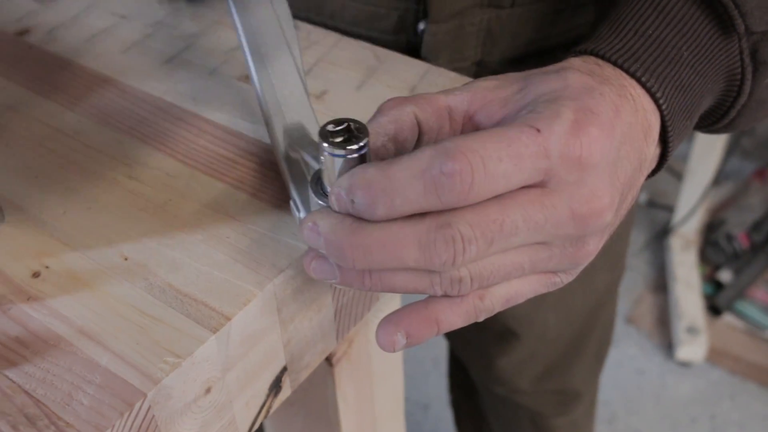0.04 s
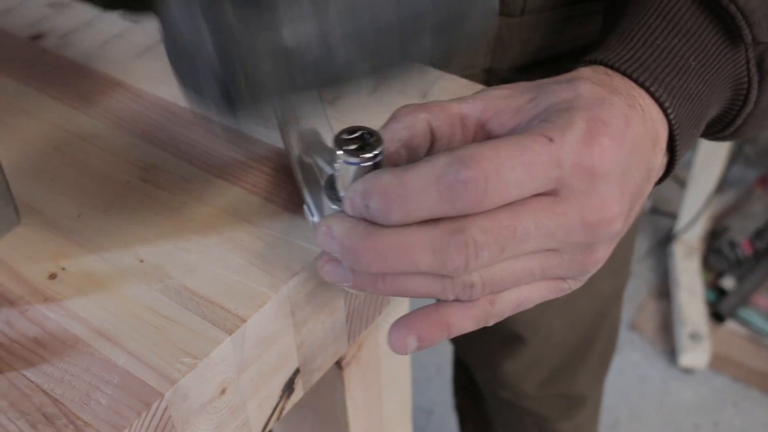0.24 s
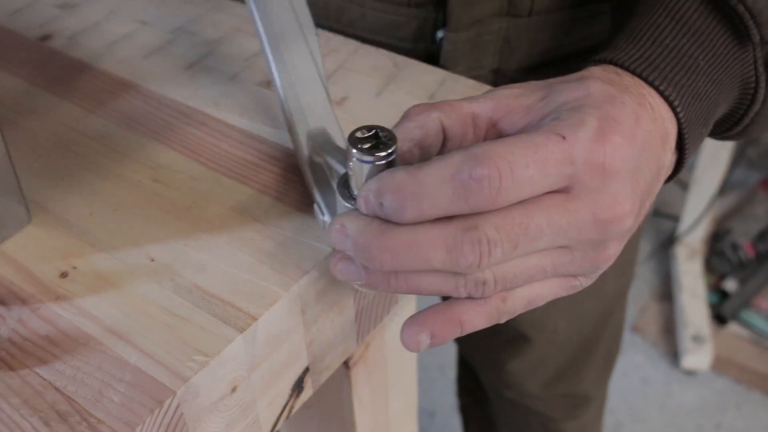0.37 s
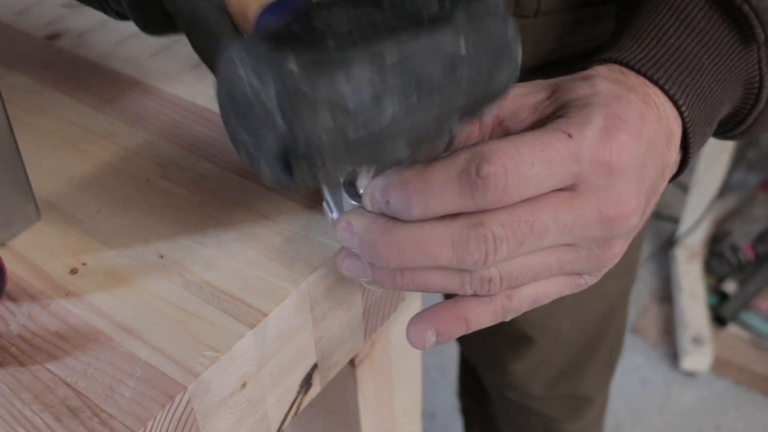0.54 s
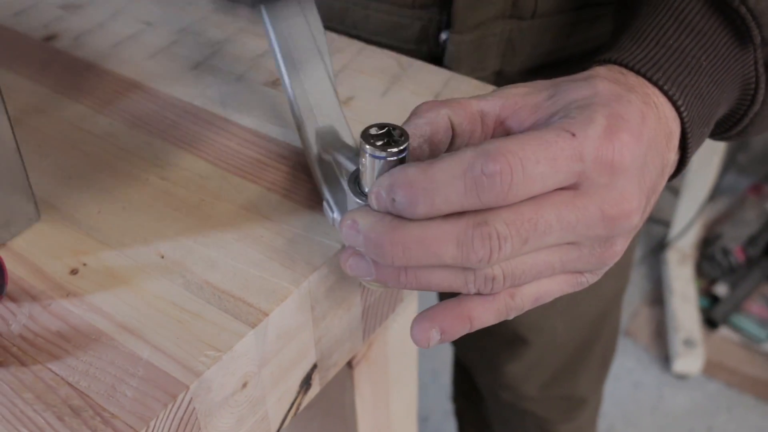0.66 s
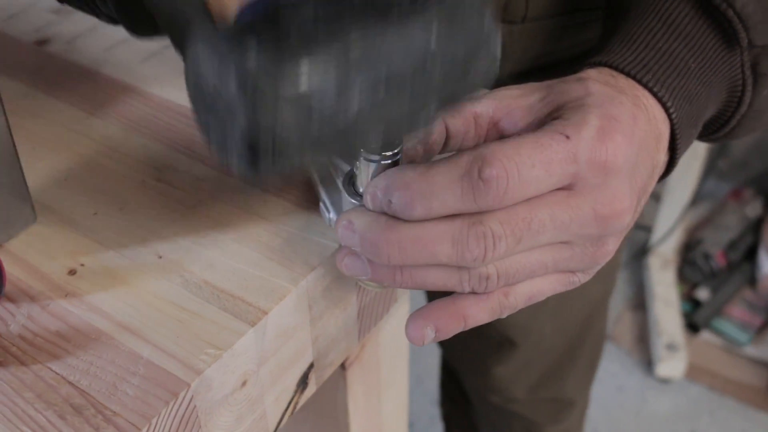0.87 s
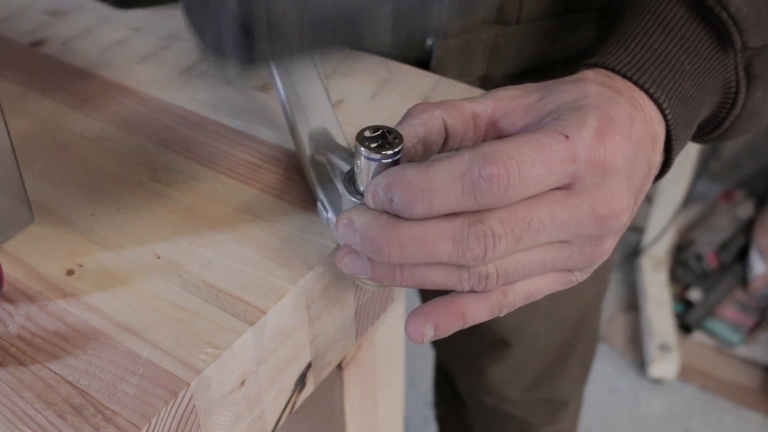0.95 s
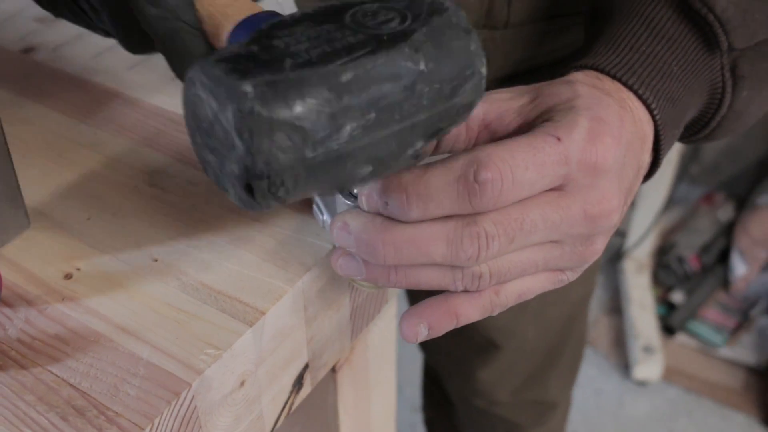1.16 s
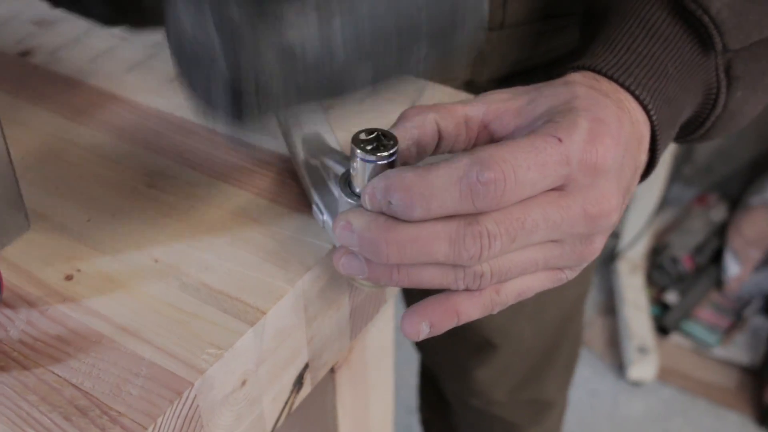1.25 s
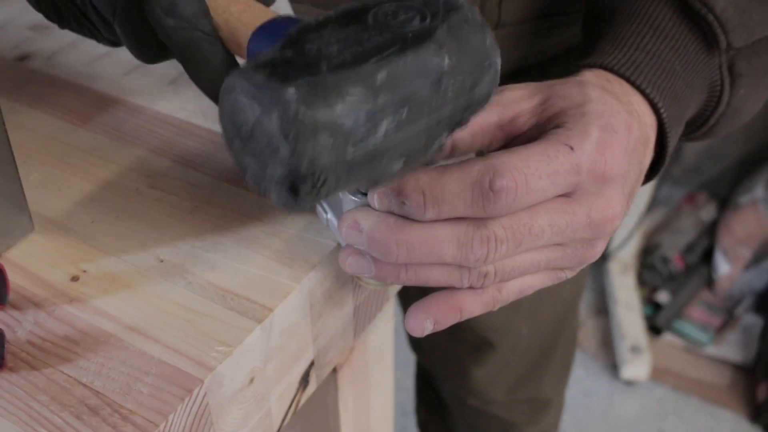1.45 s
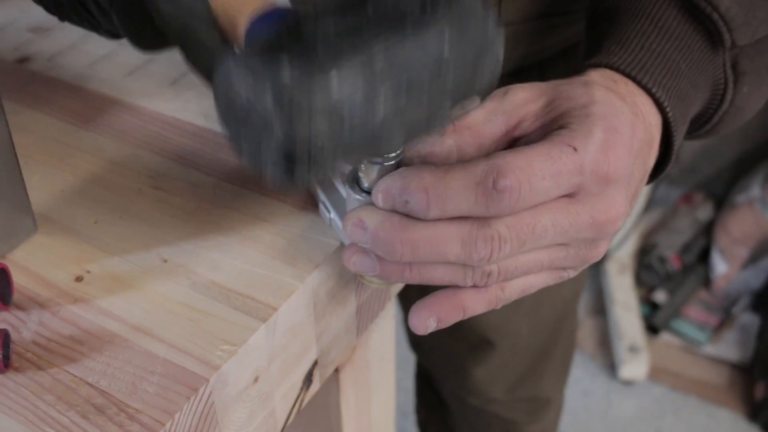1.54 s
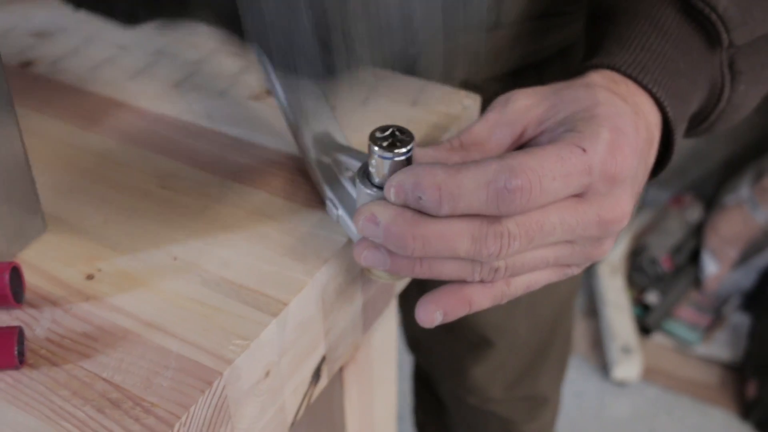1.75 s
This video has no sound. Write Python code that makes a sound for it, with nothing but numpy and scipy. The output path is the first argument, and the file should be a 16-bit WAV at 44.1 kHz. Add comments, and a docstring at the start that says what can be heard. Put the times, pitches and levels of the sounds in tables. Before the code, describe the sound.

Evenly spaced mallet taps on a hand-held metal socket, woody knock and short steel clink

```python
"""A small workshop, one microphone channel: a rubber mallet taps a steel socket about three times a second,
driving a bushing out of a part held on a wooden bench.
Damped sines ring the bench top and the hand-held socket; shaped noise bursts make the wood, clack and ticks.
Lighter steel ringing rattles as the socket settles. Nearby surfaces and a noise-built tail answer,
and a few shop resonances linger over a quiet hiss. The first tap comes before the start: only its tail is heard."""
import sys
import numpy as np
from scipy import signal
from scipy.fft import rfft, irfft, next_fast_len
from scipy.io import wavfile

SR = 44100
rng = np.random.default_rng(int(sys.argv[2]) if len(sys.argv) > 2 else 0)


def output_pcm(signal):
    """Save a mono or channel-first signal as 16-bit PCM at the path in sys.argv[1].

    Samples are clipped to [-1, 1] before scaling.
    """
    pcm = np.clip(np.atleast_2d(signal).T, -1, 1) * 32767
    wavfile.write(sys.argv[1], SR, np.round(pcm).astype(np.int16))


N = 79380
T = np.arange(SR) / SR  # one second of time for each struck sound [s]


def amp(db):
    """Decibels to gain."""
    return 10 ** (np.asarray(db) / 20)


def along(points, hz):
    """Values of (frequency, value) points joined on a log frequency axis."""
    point_hz, value = np.transpose(points)
    return np.interp(np.log(hz + 1), np.log(point_hz + 1), value)


def filtered(x, gain):
    """x times a gain that depends on frequency."""
    size = next_fast_len(len(x) + 8192)
    spectrum = rfft(x, size) * gain(np.fft.rfftfreq(size, 1 / SR))
    return irfft(spectrum, size)[:len(x)]


def noise(colour_db, size):
    """Noise of rms 1 with the given spectrum."""
    x = filtered(rng.standard_normal(size), lambda hz: amp(colour_db(hz)))
    return x / x.std()


def burst(colour_db, hold_s, t60_s):
    """Crowded modes: noise that holds, then dies."""
    decay = amp(-60 * np.maximum(T - hold_s, 0) / t60_s)
    return noise(colour_db, size=len(T)) * decay


def ring(modes):
    """Damped sines; neighbouring modes start in opposite directions."""
    attack_cycles = 0.73  # a mode swells over this many of its own cycles
    total = np.zeros(len(T))
    for k, (hz, db, t60_s) in enumerate(modes):
        swell = 1 - np.exp(-T * hz / attack_cycles)
        total += (-1) ** k * amp(db - 60 * T / t60_s) * np.sin(2 * np.pi * hz * T) * swell
    return total


def add(track, start_s, x):
    """Mix x into the track at start_s; whatever falls outside the track is cut."""
    i = round(start_s * SR)
    x = x[max(-i, 0):max(len(track) - i, 0)]
    track[max(i, 0):][:len(x)] += x


# spectrum of the workshop hiss: (frequency [Hz], relative level [dB])
HISS_COLOUR = [(20, 22), (45, 5.5), (100, 12.5), (170, 5), (400, 6), (1000, 7.5), (2000, -4), (4000, -11),
               (8000, -12.5), (15500, -14)]


def hiss():
    """The quiet workshop between taps: steady coloured noise."""
    hiss_db = -61.5
    return amp(hiss_db) * noise(lambda hz: along(HISS_COLOUR, hz), size=N)


# modes of the bench top and the part on it: (frequency [Hz], level [dB], t60 [s])
BENCH_MODES = [(111, -21.5, .062), (156.1, -28.5, 0.17), (239.8, -8, 0.04), (289, -10, .05),
               (339.5, -21.5, 0.12), (400, -5.5, 0.023), (462.3, -17, 0.094), (596.6, -20.5, 0.097),
               (723.5, -20, .173), (789, -20, .066), (886.1, -12.5, 0.05), (988.7, -13, 0.092),
               (1175, -24.5, 0.13), (1254.3, -13.5, 0.0814), (1321, -16.5, 0.078), (1600, -11, 0.02),
               (1736, -18.5, .07), (1839, -18, 0.022)]


def bench(thump_db, knock_db):
    """The blow passes through the part and rings the wooden top."""
    thump_hz, knock_hz = 388, 700  # thump drives the modes below, knock those above, blended between
    struck = []
    for hz, db, t60_s in BENCH_MODES:
        drive_db = np.interp(hz, [thump_hz, knock_hz], [thump_db, knock_db])
        struck.append((hz, db + drive_db, t60_s))
    return ring(struck)


# near surfaces around the microphone: (delay after the direct sound [s], level [dB])
NEAR_SURFACES = [(.00354, -14), (.00842, -18.5), (0.0116, -19)]
# spectrum of the workshop's tail: (frequency [Hz], level [dB])
TAIL_COLOUR = [(60, -13), (260, -13), (500, -10.5), (1000, -10.5), (1600, -14.5), (3000, -23),
               (5000, -19.5), (12000, -15)]
# decay of the workshop's tail: (frequency [Hz], t60 [s])
TAIL_T60 = [(100, 0.55), (300, 0.39), (1000, 0.4), (2500, 0.41), (5000, 0.28), (12000, 0.16)]


def in_room(x, wet_db):
    """The direct sound, the near surfaces and a diffuse tail that dies at its own rate in each band."""
    build_s = .006
    hz, t, grid = signal.stft(rng.standard_normal(len(T)), SR, nperseg=256)
    t60_s = along(TAIL_T60, hz)[:, None]
    decay = amp(wet_db + along(TAIL_COLOUR, hz)[:, None] - 60 * t / t60_s)
    unit_energy = np.sqrt(2 * np.log(1000) / (t60_s * SR))  # long tails get no extra energy
    tail = signal.istft(grid * decay * unit_energy, SR, nperseg=256)[1][:len(T)]
    answer = tail * (1 - np.exp(-T / build_s))
    for delay_s, db in NEAR_SURFACES:
        add(answer, delay_s, amp([db]))
    return x + signal.fftconvolve(x, answer)[:len(x)]


# lingering resonances of the shop: (frequency [Hz], level [dB], t60 [s])
SHOP_MODES = [(108.6, -43.5, 0.46), (163.8, -51, 0.98), (271.4, -40.5, 0.57), (540.3, -43.5, 0.63),
              (808, -46.5, 0.68), (965, -43, 0.59), (1013, -42.5, .6), (1045, -53.5, 0.89),
              (1225, -45.5, .7)]


def shop(knock_db):
    """The knock sets the workshop's lingering resonances ringing as damped sines."""
    return amp(knock_db) * ring(SHOP_MODES)


# spectrum of the crowded bench modes: (frequency [Hz], relative level [dB])
WOOD_COLOUR = [(40, -8.5), (200, -9.5), (500, -2.5), (1000, 5.5), (1500, -3), (2000, -3.5), (3000, -18),
               (5000, -21.5), (9000, -49)]


def wood(knock_db):
    """Bench modes too crowded to tell apart, as a noise burst."""
    wood_db = -21
    crowd = burst(lambda hz: along(WOOD_COLOUR, hz), hold_s=0.013, t60_s=0.09)
    return amp(knock_db + wood_db) * crowd


def clack(clack_db, clack_hz):
    """The socket slams on the bushing: a short noise band with a colour set by its seating."""
    width_oct = 0.16  # the band is 6 dB down this far from its centre

    def band_db(hz):
        return -20 * np.log10(1 + (np.log2((hz + 1) / clack_hz) / width_oct) ** 2)

    return amp(clack_db) * burst(band_db, hold_s=0.0012, t60_s=0.0095)


# spectrum of the steel contact: (frequency [Hz], relative level [dB])
TICK_COLOUR = [(1500, -17.5), (3500, 13.5), (5500, 11.5), (7000, -4), (8800, -7.5), (11500, 5.5),
               (15000, -11.5), (16500, -18.5)]


def tick():
    """The bright edge of a steel contact, a noise burst made grainy as the contact chatters."""
    grain_db, grain_s = 6.5, .0006  # depth and spacing of the random level changes
    chatter = np.interp(T / grain_s, np.arange(len(T)), rng.standard_normal(len(T)))
    contact = burst(lambda hz: along(TICK_COLOUR, hz), hold_s=0.0038, t60_s=0.037)
    return amp(grain_db * chatter) * contact


def crack(knock_db, clack_db, clack_hz, tick_db):
    """The noisy part of a tap: crowded wood modes, steel clack and bright tick."""
    return wood(knock_db) + clack(clack_db, clack_hz) + amp(tick_db) * tick()


# the socket, damped by the fingers; socket() and rattle() both play it:
# (frequency [Hz], level at a tap [dB], level at a rattle [dB], t60 [s])
SOCKET_MODES = [(3134, -32, -49, .12), (3400, -27, -41.5, .055), (3904, -25.5, -16.5, 0.042),
                (4600, -32.5, -30, 0.1), (5480, -34.5, -51, .07), (6495, -45.5, -43, .09),
                (10930, -53, -34, 0.026), (14060, -55.5, -44, .035)]


def socket(ring_db, ping_db):
    """The struck socket clinks between the fingers: damped modes and one bright ping."""
    ping_hz, ping_t60_s = 5208, .066
    grip = 1.7  # above 1: the fingers damp the ping ever faster
    ping = amp(ping_db - 60 * (T / ping_t60_s) ** grip) * np.sin(2 * np.pi * ping_hz * T)
    # each mode's level varies a little from tap to tap
    modes = [(hz, ring_db + db + rng.normal(0, 1), t60_s) for hz, db, _, t60_s in SOCKET_MODES]
    return ping + ring(modes)


def after_ring(db):
    """A thin steel tone swells as the mallet lifts off, then fades."""
    tone_hz, t60_s, swell_s = 6961, .55, .09
    envelope = amp(db - 60 * T / t60_s) * (1 - np.exp(-T / swell_s))
    return envelope * np.sin(2 * np.pi * tone_hz * T)


def rattle():
    """A light steel-on-steel bounce with no weight behind it: socket modes and a faint tick."""
    tick_db = -42
    modes = [(hz, db, t60_s) for hz, _, db, t60_s in SOCKET_MODES]
    return ring(modes) + amp(tick_db) * tick()


# mallet taps: (time [s], thump [dB], knock [dB], clack [dB], clack centre [Hz],
# socket ring [dB], tick [dB], ping [dB], thin after-ring [dB])
MALLET_TAPS = [(-.115, 2, 2, -9.5, 2950, 0, -37.5, -29, -72),
               (0.2153, 0.5, 0, -10, 3520, -1.5, -35, -20, -44.5),
               (0.5566, 0, -2.5, -15, 2963, -2, -30, -29.5, -81),
               (0.8834, -1, -1, -12.5, 2550, 0, -42, -38, -64.5),
               (1.2038, 0.5, -2, -19, 3400, -0.5, -51, -59, -62),
               (1.5308, -4.5, -8, -15.5, 2503, -3.5, -51, -49.5, -56)]
# the loose socket falls back on the part: (time [s], level [dB])
SOCKET_RATTLES = [(0.2233, -4), (0.5622, -5.5), (0.8953, -14.5), (1.5445, -6), (1.5901, -28.5)]


def scene():
    """Taps and rattles in the shop, over its steady hiss."""
    bench_wet_db, crack_wet_db, steel_wet_db = -3, 4, -4.5  # room level of each part
    out = hiss()
    for s, thump_db, knock_db, clack_db, clack_hz, ring_db, tick_db, ping_db, after_db in MALLET_TAPS:
        add(out, s, in_room(bench(thump_db, knock_db), bench_wet_db))
        add(out, s, shop(knock_db))
        add(out, s, in_room(crack(knock_db, clack_db, clack_hz, tick_db), crack_wet_db))
        add(out, s, in_room(socket(ring_db, ping_db), steel_wet_db))
        add(out, s, after_ring(after_db))
    for s, db in SOCKET_RATTLES:
        add(out, s, amp(db) * in_room(rattle(), steel_wet_db))
    return out[None]


def record(dry):
    """The recorder keeps nothing above its band limit: a very steep low-pass."""
    top_hz = 16300
    return np.array([filtered(x, lambda hz: 1 / np.sqrt(1 + (hz / top_hz) ** 160)) for x in dry])


dry = scene()
out = record(dry)
output_pcm(out)
```